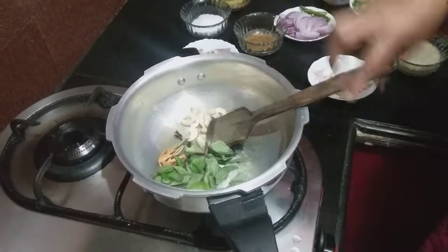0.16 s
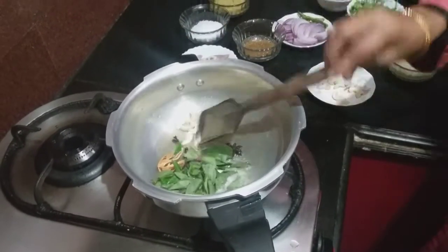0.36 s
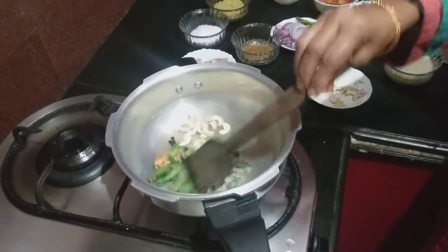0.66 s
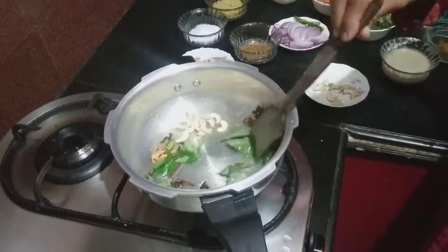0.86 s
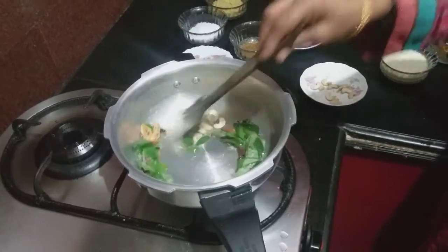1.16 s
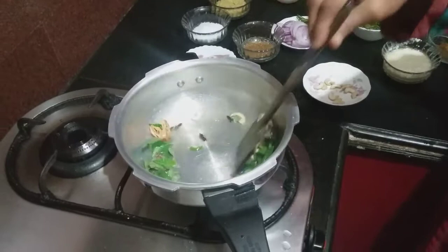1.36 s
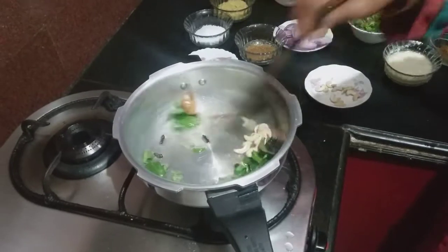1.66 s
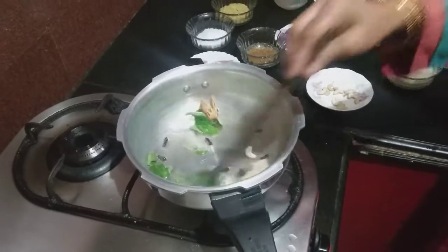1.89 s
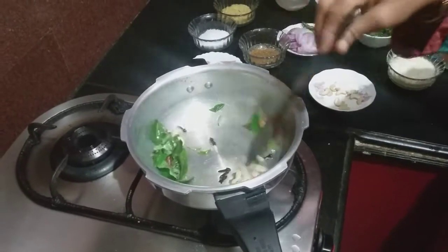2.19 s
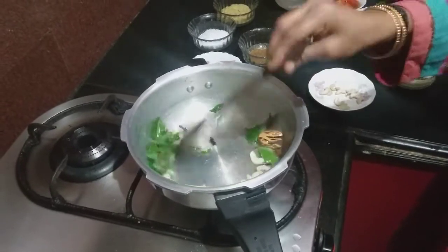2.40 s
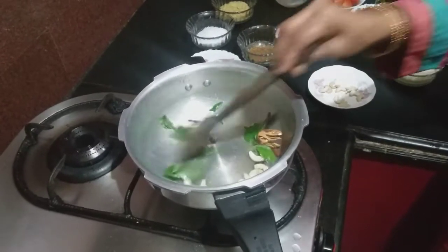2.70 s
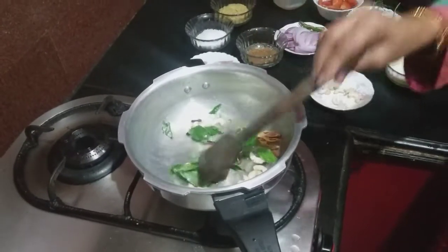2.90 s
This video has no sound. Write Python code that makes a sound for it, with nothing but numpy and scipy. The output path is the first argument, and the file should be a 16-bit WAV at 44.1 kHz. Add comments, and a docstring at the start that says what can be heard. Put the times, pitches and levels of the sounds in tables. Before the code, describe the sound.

Fresh leaves fry in hot oil with loud snapping pops and crackle, surging and easing unevenly, while a wooden spatula briefly scrapes the metal pot; small kitchen, close microphone, very faint room hum.

```python
"""Leaves frying in an aluminium pot

Fresh leaves fry in hot oil: water bursts out as single pops, ragged sweeps from high to low, each with a fizz.
Below them runs a dense crackle of filtered clicks; some low thuds are sines that sink in pitch.
A wooden spatula scrapes (resonant grit) and knocks the pot (ringing modes with a woody noise thud).
Decaying noise tails give the reflections of pot and small kitchen, over a bed of wavering coloured noise."""
import sys
import numpy as np
from scipy import signal
from scipy.fft import rfft, irfft
from scipy.io import wavfile
from scipy.ndimage import uniform_filter1d

SR = 44100
rng = np.random.default_rng(int(sys.argv[2]) if len(sys.argv) > 2 else 0)


def store_pcm(level_fs):
    """Save levels as 16-bit WAV."""
    pcm = np.round(np.clip(level_fs, -1, 1) * 32767).astype(np.int16)
    wavfile.write(sys.argv[1], SR, np.atleast_2d(pcm).T)


N = 134505

# loud pops of the oil, levels before the trim in pops():
# (time [s], body level [dB], snap level [dB], top level [dB])
POPS = [(0.036, -20, -25, -58), (0.047, -23, -24, -59), (0.0859, -21, -21, -47), (0.0903, -24, -13.5, -42),
        (0.1093, -15.5, -10.5, -33), (0.147, -47, -18.5, -33.5), (0.1664, -28, -17, -45),
        (0.1892, -25.5, -23, -51), (0.1952, -21, -15, -49), (0.2434, -25.5, -16.5, -52),
        (0.2788, -30.5, -20, -37), (0.3152, -32, -19, -53), (0.337, -27, -23, -59), (0.3435, -20, -15, -44),
        (0.3515, -31, -16, -47), (0.3885, -17.5, -18, -48), (0.3957, -17.5, -14, -34),
        (0.4567, -24.5, -23.5, -43), (0.509, -26.5, -13, -34), (0.6102, -32.5, -24.5, -46),
        (0.638, -33.5, -33, -51), (0.667, -24, -34, -53), (0.6784, -33, -22.5, -55),
        (0.7134, -30.5, -23, -45), (0.7366, -32, -15.5, -35), (0.7586, -24.5, -20, -46),
        (0.772, -44, -19, -31.5), (0.7876, -27, -16.5, -50), (0.811, -28, -21.5, -43),
        (0.8174, -25, -19, -42), (0.84, -49, -23, -52), (0.8541, -22, -19.5, -60),
        (0.8812, -23, -17.5, -44), (0.9122, -20.5, -38, -42), (0.9322, -24, -16.5, -33.5),
        (1.001, -44, -25, -44), (1.0297, -20, -26, -51), (1.088, -23.5, -19, -36), (1.1164, -38, -34, -60),
        (1.126, -36, -16, -40), (1.1395, -40, -18, -35), (1.155, -18.5, -15.5, -47),
        (1.1908, -33, -26, -49), (1.204, -37, -20, -40), (1.2101, -34, -15, -33.5),
        (1.2961, -20.5, -17.5, -42), (1.3116, -18, -17.5, -36.5), (1.3727, -18.5, -16, -40.6),
        (1.3868, -24, -12, -38), (1.4277, -26.5, -18, -43), (1.4878, -19, -15, -39),
        (1.5074, -20.5, -16, -35), (1.5794, -30, -22.5, -43), (1.6552, -44, -25.5, -51.1),
        (1.7158, -29, -19, -40), (1.721, -33, -21.5, -33), (1.7371, -19, -14.5, -42),
        (1.7858, -29, -21, -34), (1.8332, -16.5, -17.5, -46), (1.8647, -26, -15, -51),
        (1.8813, -36, -21.5, -51), (1.9059, -35, -15, -58), (1.9501, -24, -14.5, -55),
        (1.9731, -17, -13.5, -36), (2.005, -48, -16.5, -41), (2.0414, -19, -17.5, -32),
        (2.1001, -17.5, -14, -38), (2.1275, -18, -24, -52), (2.1681, -25.5, -28, -52),
        (2.1813, -25.5, -16.5, -39.5), (2.2351, -32, -21, -37.5), (2.2645, -21, -16, -33.5),
        (2.2999, -31.5, -19, -42), (2.3183, -52, -25, -42), (2.3386, -28, -24, -47.8),
        (2.3487, -32, -18, -53), (2.3914, -23.5, -15.5, -34.5), (2.4115, -19, -15.5, -52),
        (2.4205, -27, -22, -47), (2.4651, -21.5, -17, -53), (2.5012, -30.5, -23.5, -45),
        (2.6205, -32, -21.5, -40.5), (2.6567, -17.5, -14.5, -48), (2.6948, -21, -19, -75),
        (2.746, -22, -22, -46), (2.7717, -24.5, -26, -42), (2.849, -37, -18.5, -52),
        (2.8691, -27, -13, -39), (2.9079, -28, -16, -44), (2.951, -47, -31, -55), (2.9642, -26, -21, -59),
        (2.976, -40, -15.5, -39.5)]
# body, snap and top bands of pops and crackle: (low edge [Hz], high edge [Hz])
BANDS_HZ = [(450, 3300), (3300, 8300), (8300, 16000)]
# colour of a burst in the pot: (frequency [Hz], level [dB])
BURST_COLOUR = [(100, -19), (400, -10), (520, -13), (650, 0.5), (820, -3), (1050, -9), (1400, -0.5),
                (2200, -2.5), (3200, -1), (5000, 3), (6200, 6), (7050, 10), (7500, 5), (8100, -4.5),
                (9300, -10.5), (12000, -12.5), (16000, -13.5)]


def pops(size=1024, count=24):
    """Each steam pocket bursts in a ragged sweep from high to low pitch, with its own colour."""
    # trim of body, snap and top: (level [dB])
    trim_db = [-2, 0.5, 12.5]
    max_sweep_s, mean_smear_s = 0.000657, 0.002019
    mean_tint_db = 2.5  # how far each pop strays from the common colour
    level_window_s = 0.003  # the table's levels are rms over this time

    out = np.zeros(N)
    f = np.arange(size // 2 + 1) * SR / size
    knots = np.linspace(0, SR / 2, count)
    colour = rfft(response(BURST_COLOUR), size)
    window_gain = np.sqrt(level_window_s * SR / size)
    for row, (sweep, smear, tint) in zip(POPS, rng.random((len(POPS), 3, count))):
        # low pitches arrive later than high ones
        late_s = max_sweep_s * sweep[0] + 2 * mean_smear_s * np.interp(f, knots, smear)
        late_s = late_s * np.exp(-f / 5000)
        phase = -2 * np.pi * np.cumsum(late_s) * SR / size
        gain = colour * undb(2 * mean_tint_db * np.interp(f, knots, 2 * tint - 1))
        burst = irfft(gain * np.exp(1j * phase)) * np.linspace(1, 0, size)
        for (lo, hi), db, trim in zip(BANDS_HZ, row[1:], trim_db):
            add(out, row[0], unit(band(burst, lo, hi)) * window_gain * undb(db + trim))
    return out


def fizz():
    """Each popped droplet boils away in a brief fizz, in proportion to its snap level."""
    rise_s, decay_s, below_snap_db = 0.0032, 0.022, -14.5
    power, t = np.zeros(N), np.arange(SR // 5) / SR
    shape = np.minimum(t / rise_s, 1) ** 2 * np.exp(-(t / decay_s) ** 2)
    for start, _, snap_db, _ in POPS:
        add(power, start, undb(snap_db + below_snap_db) ** 2 * shape)
    return bubbling() * np.sqrt(power)


def crackle():
    """Countless small bursts: wet crackle of leaves, bright sizzle with sharp ticks, and fine spatter."""
    # strength of the frying before the trims:
    # (time [s], wet crackle level [dB], sizzle level [dB], fine spatter level [dB])
    frying = [(0.0, -34, -22, -26), (0.08, -37.5, -31, -43), (0.125, -26.5, -28, -30.5),
              (0.305, -36.5, -31, -40), (0.51, -43, -35, -49), (0.71, -46, -46, -48), (0.77, -35, -49, -37),
              (0.9, -24.5, -18.5, -37), (1.0, -25.5, -19, -34), (1.09, -26, -19, -30),
              (1.22, -28.5, -21.5, -33), (1.32, -25.5, -22.5, -31.5), (1.48, -36, -28, -46),
              (1.56, -39, -33, -41), (1.77, -35.5, -33, -41), (1.92, -34.5, -35, -34),
              (2.0, -27, -26.5, -31.5), (2.14, -39, -28, -34), (2.33, -39.5, -49, -38),
              (2.46, -29, -22.5, -37), (2.6, -49.5, -37, -42.5), (2.69, -31, -29.5, -44),
              (2.84, -45.5, -33.5, -42), (2.94, -38.5, -43, -46), (3.05, -41.5, -31.5, -40)]
    trims_db = (-3.5, -4.5, -2.5)  # wet crackle, sizzle, spatter
    needle_db = 0  # sharp ticks relative to the bubbling, before the band-pass

    t = np.arange(N) / SR
    times, *levels = np.array(frying).T
    wet = bubbling()
    needles = unit(through(clicks(per_s=220, spread_db=2.5), response(BURST_COLOUR)))
    sizzle = wet + undb(needle_db) * needles
    spatter = unit(through(clicks(per_s=2500, spread_db=9), response(BURST_COLOUR)))
    out = np.zeros(N)
    for x, (lo, hi), level, trim in zip((wet, sizzle, spatter), BANDS_HZ, levels, trims_db):
        out += unit(band(x, lo, hi)) * undb(np.interp(t, times, level) + trim)
    return out


def bubbling():
    """A dense stream of tiny bursts, each at one of the bubble pitches, among broad ticks; rms 1."""
    # pitches of the small bubbles: (frequency [Hz], level [dB])
    pitches = [(800, -1), (1600, -2.5), (2400, -2), (3300, 0), (4400, 7), (5700, 4.5), (7100, 1)]
    width_hz, tick_db = 590, 3  # ticks relative to the grains
    grains = np.zeros(N)
    for hz, db in pitches:
        grains += undb(db) * resonate(clicks(per_s=260, spread_db=7.0), hz, width_hz)
    ticks = reflect(clicks(per_s=170, spread_db=0.5), t60_s=0.0035, delay_s=0)
    return unit(through(unit(grains) + undb(tick_db) * unit(ticks), response(BURST_COLOUR)))


def thumps():
    """Short low thuds among the pops, sines that sink in pitch as they die."""
    # low thuds: (time [s], level [dB])
    thuds = [(0.1657, -25.5), (0.507, -43), (0.7385, -31), (0.788, -42), (1.1186, -34), (1.127, -28),
             (1.139, -27.5), (1.21, -34), (2.87, -40), (2.975, -24)]
    start_hz, sag_s, decay_s = 560, 0.0015, 0.013  # the pitch has halved after sag_s
    out, t = np.zeros(N), np.arange(SR // 8) / SR
    hz = start_hz / (1 + t / sag_s)
    thud = -np.sin(2 * np.pi * np.cumsum(hz) / SR) * np.exp(-(t / decay_s) ** 2)
    for start, db in thuds:
        add(out, start, thud * undb(db))
    return out


def scrapes():
    """The spatula sticks and slips over the pot floor: resonant grit in strokes that start hard and fade."""
    # spatula strokes: (time [s], length [s], resonance [Hz], level [dB])
    strokes = [(0.101, 0.011, 1600, -42), (0.382, 0.06, 1670, -37.5), (0.899, 0.031, 2340, -29),
               (0.939, 0.031, 2060, -21.5), (1.032, 0.049, 2740, -26.5), (1.372, 0.022, 2000, -27),
               (1.828, 0.0097, 2200, -26), (2.123, 0.028, 2830, -28.5), (2.167, 0.0086, 3430, -26),
               (2.338, 0.0047, 3200, -17), (2.421, 0.022, 2430, -28), (2.658, 0.0092, 4900, -21),
               (2.881, 0.0055, 3770, -40)]
    width_hz = 1590  # of each of the two resonances in a row
    out, t = np.zeros(N), np.arange(N) / SR
    grit = band(clicks(per_s=4500, spread_db=4), 940, 5100)
    for start, length, hz, db in strokes:
        progress = np.clip((t - start) / length, 0, 1)
        slips = grit * np.minimum(progress * 20, 1) * np.sqrt(1 - progress)
        stroke = resonate(resonate(slips, hz, width_hz), hz, width_hz)
        # the level is rms over the stroke's own length
        out += unit(stroke) * np.sqrt(length * SR / N) * undb(db)
    return out


def knocks():
    """The spatula knocks the pot: a woody noise thud and the decaying modes of the metal wall."""
    # soft knocks on the wall: (time [s], level [dB])
    hits = [(0.592, -35.5), (.648, -42), (2.542, -41.5)]
    # modes of the pot's wall: (frequency [Hz], level [dB], t60 [s])
    wall_modes = [(272, 4, 0.15), (770, -9, 0.15), (1225, -7, 0.28), (1300, -9, 0.12)]
    thud_db, thud_decay_s = -5, 0.029
    out, t = np.zeros(N), np.arange(SR // 2) / SR
    wall = sum(undb(db - 60 * t / t60) * np.sin(2 * np.pi * hz * t) for hz, db, t60 in wall_modes)
    for start, db in hits:
        wood = unit(band(rng.standard_normal(len(t)), 220, 480)) * np.exp(-t / thud_decay_s)
        add(out, start, (wall + wood * undb(thud_db)) * undb(db))
    return out


def pot_ring(oil):
    """Frying and scraping set off the decaying modes of the air inside the pot."""
    # modes of the air inside the pot: (frequency [Hz], level [dB], t60 [s])
    cavity_modes = [(641.5, -2.5, 0.14), (770, -3.5, 0.25), (803, -2, 0.28), (1530, -36, .1),
                    (2300, -25, 0.099)]
    ring_db = -49.5
    t = np.arange(SR // 2) / SR
    cavity = sum(undb(db - 60 * t / t60) * np.cos(2 * np.pi * hz * t) for hz, db, t60 in cavity_modes)
    return through(oil, cavity) * undb(ring_db)


def reflect(x, t60_s, delay_s, count=8):
    """Bursts come from ever different spots in the pot, each with its own reflections."""
    hold = SR // 250  # a new spot every 4 ms
    spot = np.repeat(rng.integers(count, size=N // hold + 1), hold)[:N]
    out = np.zeros(N)
    for k in range(count):
        gate = uniform_filter1d(1. * (spot == k), size=24)  # soft edges
        out += through(x * gate, tail(t60_s, delay_s))
    return out


def tail(t60_s, delay_s, size=22050):
    """Dense decaying reflections as fading noise of unit energy."""
    t = np.arange(size) / SR
    h = rng.standard_normal(size) * undb(-60 * t / t60_s) * (t > delay_s)
    return unit(h) / np.sqrt(size)


def kitchen_air():
    """Kitchen background: coloured noise whose level wanders slowly."""
    # colour of the background: (frequency [Hz], level per Hz [dB])
    air_colour = [(25, -17), (55, -13), (95, 0.5), (170, -1.5), (220, -4), (280, 7), (380, -22),
                  (700, -9.5), (2000, -11), (8000, -20)]
    centre_db, waver_db = -51, 3
    noise = unit(through(rng.standard_normal(N), response(air_colour, size=8192)))
    return noise * undb(centre_db + waver_db * waver())


def undb(db):
    """Decibels to gain."""
    return 10 ** (np.asarray(db) / 20)


def unit(x):
    """Scale to rms 1."""
    return x / np.sqrt(np.mean(x ** 2) + 1e-20)


def add(out, start_s, x):
    """Mix x into out from a given time."""
    i = max(int(start_s * SR), 0)
    out[i:i + len(x)] += x[:max(len(out) - i, 0)]


def band(x, lo_hz, hi_hz):
    """Causal band-pass."""
    sos = signal.butter(3, [lo_hz, min(hi_hz, .48 * SR)], "band", fs=SR, output="sos")
    return signal.sosfilt(sos, x)


def resonate(x, hz, width_hz):
    """One broad resonance."""
    return signal.lfilter(*signal.iirpeak(hz, hz / width_hz, fs=SR), x)


def response(points, size=1024):
    """Causal minimum-phase impulse response with the given (Hz, dB) colour."""
    hz, db = np.array(points, float).T
    f = np.maximum(np.arange(size // 2 + 1) * SR / size, 1)
    gain = undb(np.interp(np.log(f), np.log(np.sort(hz)), db))
    # folding the cepstrum forward in time makes the response causal
    cepstrum = irfft(np.log(gain))
    cepstrum[1:size // 2] *= 2
    cepstrum[size // 2 + 1:] = 0
    return irfft(np.exp(rfft(cepstrum)))


def through(x, ir):
    """Pass x through an impulse response."""
    return signal.fftconvolve(x, ir)[:len(x)]


def clicks(per_s, spread_db):
    """Random clicks of either sign, many weak and a few strong."""
    size = undb(spread_db * np.minimum(rng.exponential(size=N), 3))
    return (rng.random(N) < per_s / SR) * size * rng.choice([-1, 1], N)


def waver(count=40):
    """A slow random wander with a spread near 1."""
    return np.interp(np.linspace(0, count - 1, N), np.arange(count), rng.uniform(-2, 2, count))


def scene():
    """Oil and spatula with the reflections of pot and kitchen; mainly the treble is wide."""
    # width of the sound: (frequency [Hz], side minus mid level [dB])
    side_colour = [(100, -51), (2500, -65), (7300, -46), (7800, -15), (9000, -6), (16000, -9)]
    early_db, late_db = -4, -3
    oil = pops() + fizz() + crackle() + scrapes()
    early = undb(early_db) * reflect(oil, t60_s=0.035, delay_s=0.0012)
    late = undb(late_db) * reflect(oil, t60_s=0.19, delay_s=0.0046)
    mid = oil + early + late + thumps() + knocks() + pot_ring(oil + early) + kitchen_air()
    side = through(reflect(mid, t60_s=0.11, delay_s=0), response(side_colour))
    return np.array([mid + side, mid - side])


def record(dry):
    """Clips peaks at full scale, then cuts the top with a steep low-pass."""
    top_hz = 15900
    low_pass = signal.ellip(10, .2, 80, top_hz, fs=SR, output="sos")
    return signal.sosfilt(low_pass, np.clip(dry, -1, 1))


dry = scene()
out = record(dry)
store_pcm(out)
```